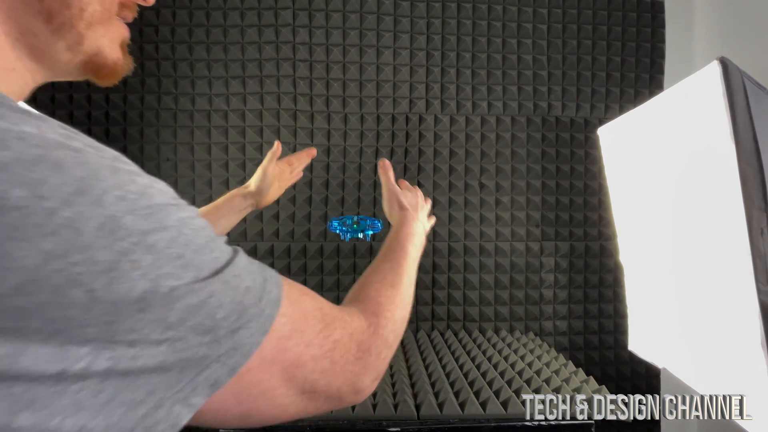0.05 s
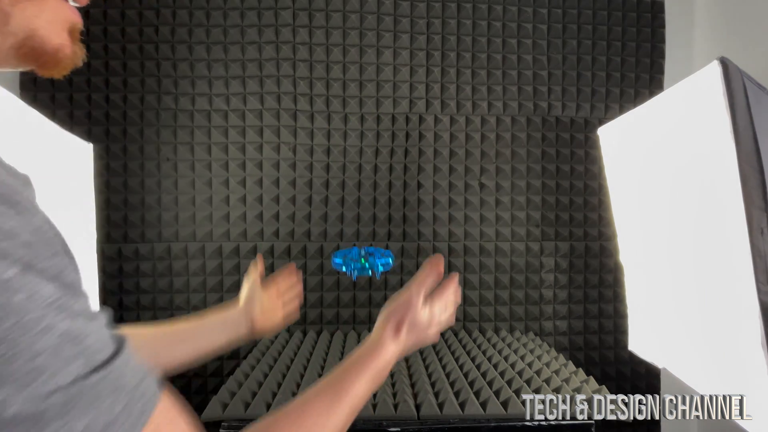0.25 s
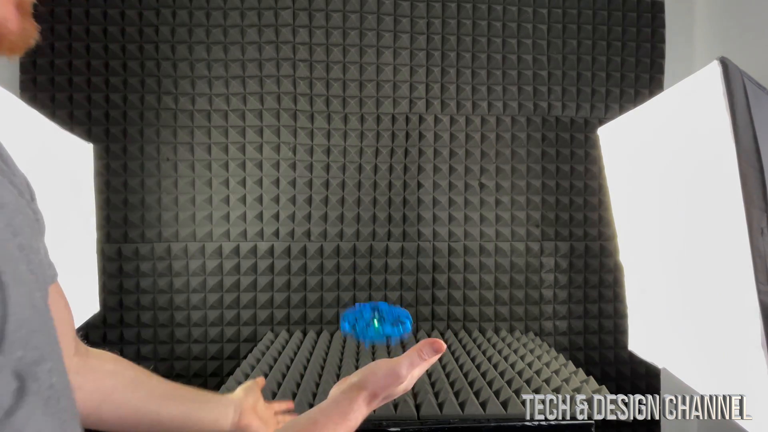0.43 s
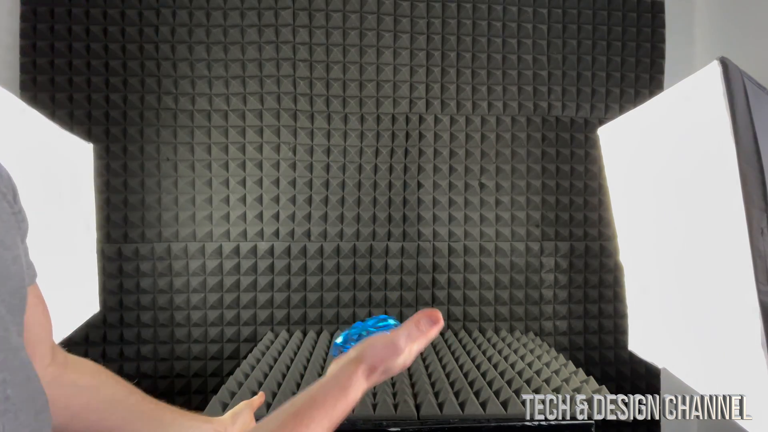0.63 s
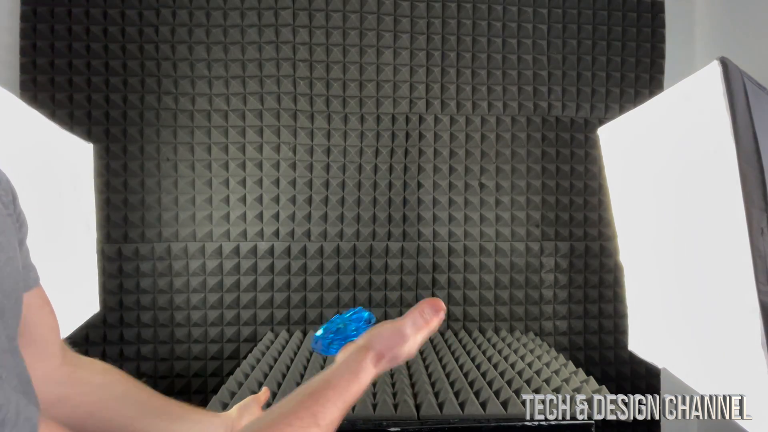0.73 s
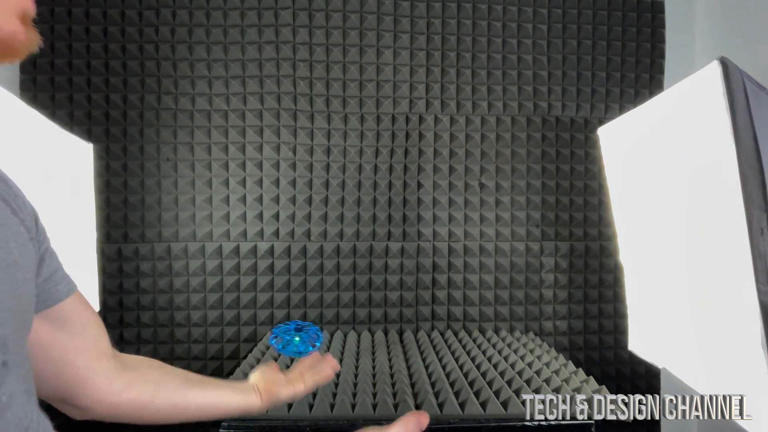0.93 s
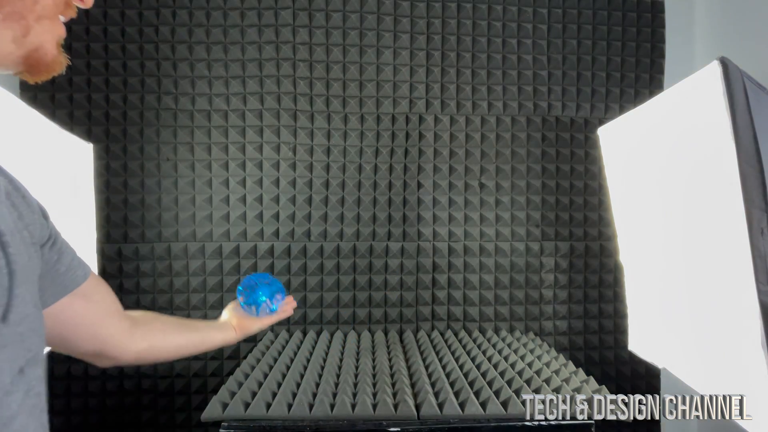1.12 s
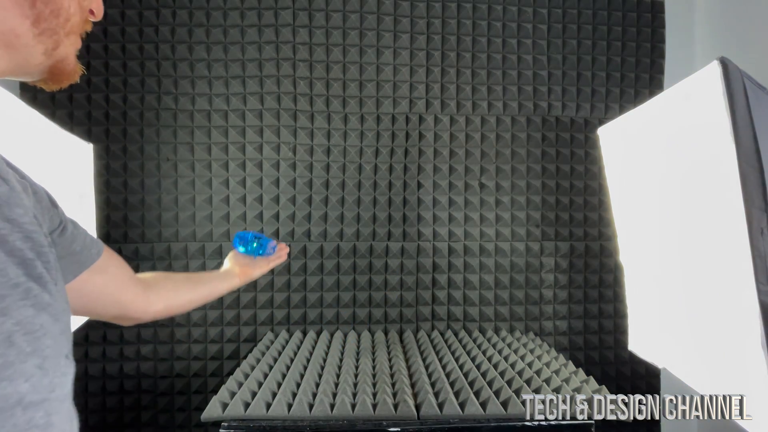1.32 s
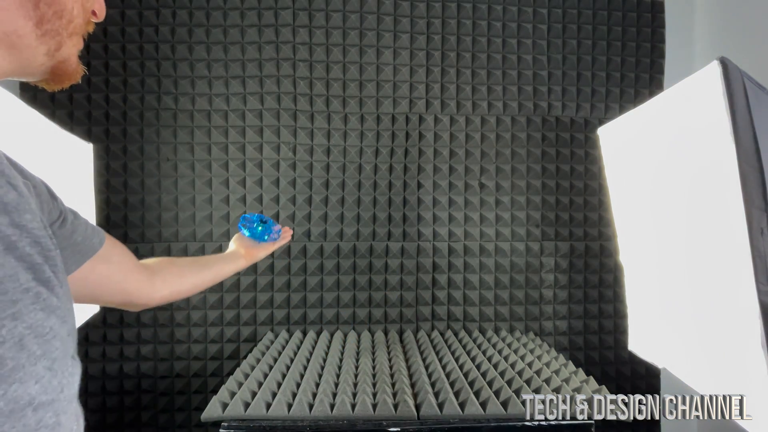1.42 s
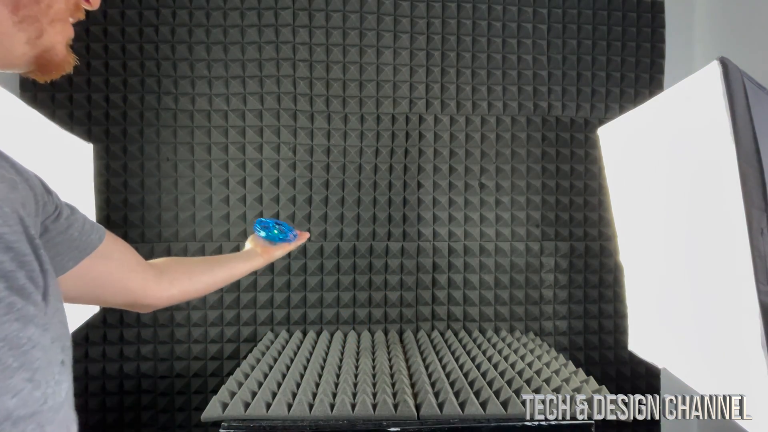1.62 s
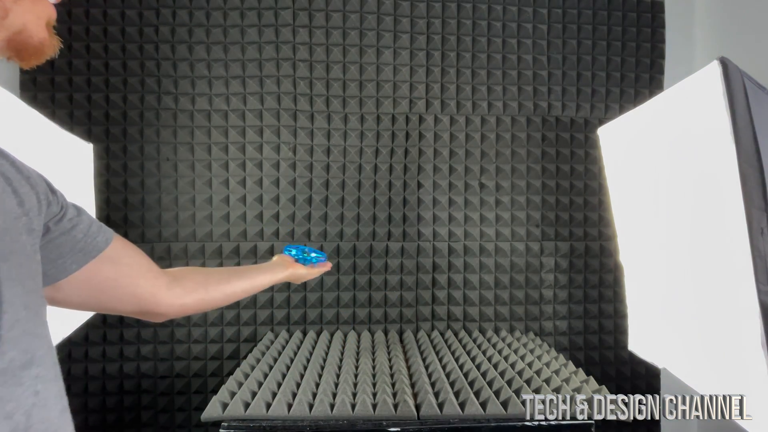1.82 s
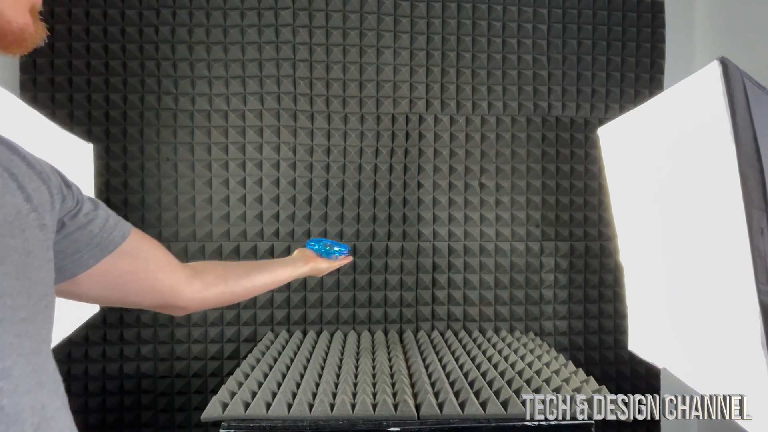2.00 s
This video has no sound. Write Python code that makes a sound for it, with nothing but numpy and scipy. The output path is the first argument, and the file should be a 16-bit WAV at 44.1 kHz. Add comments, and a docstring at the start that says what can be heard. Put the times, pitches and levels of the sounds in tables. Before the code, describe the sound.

A tiny toy drone whines and wavers, then cuts out and spins down indoors.

```python
"""A small room. A palm-sized toy drone hovers: four two-bladed rotors whine at slightly different
pitches and beat, pushing air and chopping hiss. It tips onto a hand, so two rotors race while two sag;
then all four strain, the power cuts and air drag slows them, leaving a thin rub of the motors in the
plastic shell. Underneath: a low draught on the microphone, room noise and a hum."""
import sys
import numpy as np
from scipy import signal
from scipy.fft import rfft, irfft, next_fast_len
from scipy.io import wavfile
from scipy.ndimage import map_coordinates

SR = 44100
rng = np.random.default_rng(int(sys.argv[2]) if len(sys.argv) > 2 else 0)


def transcribe(u):
    """Save the signal u as a 16-bit wav file named by the first command-line argument.

    u: samples, shape (n,) or (channels, n), limited to [-1, 1]; the rate is SR.
    q: integer samples, one column per channel.
    """
    v = np.clip(np.atleast_2d(u).T, -1, 1)
    q = np.round(v * 32767).astype(np.int16)
    wavfile.write(sys.argv[1], SR, q)


N = 90537

# Powered rotors; A and B race, C and D sag. Each row: time in seconds, blade-pass rate in Hz.
ROTOR_A_HZ = [(0, 1185), (0.118, 1199), (0.198, 1175), (.3, 1189), (0.349, 1236), (.47, 1232), (.5, 1416),
              (0.528, 1495), (.58, 1507), (0.619, 1545), (.69, 1533), (.755, 1240), (.795, 1467),
              (.87, 1444), (0.921, 1471), (.97, 1415)]
ROTOR_B_HZ = [(0, 1110), (.07, 1095), (.22, 1176), (.46, 1170), (.5, 1360), (.56, 1455), (.63, 1540),
              (.68, 1535), (.71, 1400), (.76, 1130), (.81, 1300), (.85, 1435), (.89, 1425), (0.929, 1360),
              (.97, 1380)]
ROTOR_C_HZ = [(0, 1170), (.1, 1150), (.2, 1170), (0.269, 1175), (0.368, 1162), (0.468, 1156), (0.529, 950),
              (0.619, 660), (.72, 620), (.82, 1020), (0.871, 1079), (0.921, 1141), (.97, 1185)]
ROTOR_D_HZ = [(0, 1075), (.18, 1095), (0.301, 1115), (.4, 1165), (0.469, 1130), (0.519, 900), (.62, 600),
              (.7, 563), (.77, 1055), (0.818, 1200), (0.881, 1190), (.97, 1300)]
# Mix of rotors A to D. Each row: blade tone gain in dB, overtone gain in dB, imbalance gain in dB.
ROTOR_MIX_DB = [(-34, -38, -44.5), (-35.5, -38.5, -44.5), (-38, -35.5, -48.5), (-36.5, -35, -46.5)]
# Blade overtones. Each row: multiple of the blade rate, relative level in dB.
OVERTONES_DB = [(2, 0), (3, -2.5), (4, -5.5), (5, -5.5), (6, -6.5), (8, -11), (11, -18.5)]
# Imbalance lines. Each row: odd multiple of the shaft rate, relative level in dB.
IMBALANCE_DB = [(1, -5.5), (3, -0.5), (5, 4.5), (7, -7.5), (11, -7), (19, -13)]
# Envelopes of blade tone, hiss, draught and room noise. Each row: time in seconds, gain in dB.
TONE_ENVELOPE_DB = [(0, -5), (.05, 2), (.2, 0.5), (.24, 6), (.3, 0.5), (.34, -3.5), (.52, 0), (.63, -1),
                    (.78, -1.5), (.86, 2.5), (.97, 0), (1.0, -5.5), (1.2, -8.5), (1.45, -19.5)]
HISS_ENVELOPE_DB = [(0, -30), (.13, -29.5), (.17, -26.5), (.48, -24.5), (.53, -31.5), (.6, -42.5),
                    (.74, -30.5), (.8, -22.5), (.89, -22), (.97, -25), (1.06, -37.5), (1.22, -61),
                    (1.5, -67), (1.8, -81.5)]
DRAUGHT_ENVELOPE_DB = [(0, -56), (.24, -54), (.45, -56), (.68, -55), (.74, -49.5), (.85, -50.5),
                       (1.15, -52.5), (1.3, -55.5), (1.7, -57), (1.85, -58)]
ROOM_NOISE_ENVELOPE_DB = [(1.4, -61.5), (1.6, -73.5), (1.77, -66.5), (1.85, -62.5), (2.05, -61)]
# Noise spectra. Each row: frequency in Hz, relative density in dB.
WASH_SPECTRUM_DB = [(40, -11), (130, -15.5), (300, -1.5), (600, -4), (1100, -0.5), (1750, -1.5),
                    (2700, 4.5), (4200, -2), (7000, -15), (15000, -11.5)]
HISS_SPECTRUM_DB = [(300, -29.5), (1700, -16), (2400, -11), (3400, -6.5), (4200, -5.5), (5100, -2.5),
                    (6200, 0), (7200, 2.5), (8400, 1.5), (9800, -4), (12500, -3), (15500, -9.5)]
RUB_SPECTRUM_DB = [(500, -37.5), (1000, -37), (2100, -17.5), (2800, -9), (3300, -3.5), (3850, 1),
                   (4300, -7), (5000, -17), (9000, -27), (15000, -35)]
DRAUGHT_SPECTRUM_DB = [(10, 8), (28, 2), (45, -8), (75, -14), (120, -16.5), (200, -27.5), (600, -62)]
ROOM_NOISE_SPECTRUM_DB = [(20, -2.5), (65, -8), (110, -9.5), (200, -14), (400, -14), (900, -24),
                          (1700, -20), (3500, -32), (7000, -33.5), (15000, -35)]
# Room decay. Each row: frequency in Hz, time to fall 60 dB in seconds.
ROOM_T60_S = [(200, 0.41), (1400, 0.37), (4000, 0.52), (12000, 0.48)]

HOVER_HZ, HOVER_HISS_DB = 1200, -28  # references for speed and inflow
CUT_S, HALF_SPEED_S, RUB_STOP_S = 1, .11, 1.775
TONE_DB_PER_OCTAVE, OVERTONE_DB_PER_OCTAVE = 16, 17.5


def amp(db):
    """Decibels to gain."""
    return 10 ** (np.asarray(db) / 20)


def unit_rms(x):
    """Scale to rms 1."""
    return x / np.sqrt(np.mean(x ** 2) + 1e-20)


def log_lookup(rows, at):
    """Read (frequency, value) rows on a log axis."""
    frequencies, values = np.transpose(rows)
    return np.interp(np.log(at + 1e-9), np.log(frequencies), values)


def time_s():
    """Time of each sample."""
    return np.arange(N) / SR


def curve(rows):
    """Join (seconds, value) rows by straight lines."""
    return np.interp(time_s(), *np.transpose(rows))


def wobble(knots_per_s, step=8):
    """Smooth random curve."""
    at_s = np.arange(0, N + step, step) / SR
    spline = map_coordinates(rng.standard_normal(4096), [at_s * knots_per_s], mode="wrap")
    return np.interp(time_s(), at_s, spline)


def filtered(x, gain_at_hz):
    """Zero-phase FFT filter."""
    size = next_fast_len(N + SR // 2)
    return irfft(rfft(x, size) * gain_at_hz(np.fft.rfftfreq(size, 1 / SR)), size)[..., :N]


def coloured(x, spectrum_db):
    """Shape x by a spectrum, at rms 1."""
    return unit_rms(filtered(x, lambda hz: amp(log_lookup(spectrum_db, hz))))


def noise(spectrum_db):
    """Coloured noise of rms 1."""
    return coloured(rng.standard_normal(N), spectrum_db)


def harmonics(phase_rad, orders, levels_db, size=8192):
    """Pressure pattern of rms 1, repeating each turn of the phase."""
    lines = np.zeros(size // 2 + 1, complex)
    lines[orders] = amp(log_lookup(levels_db, orders)) * np.exp(2j * np.pi * rng.random(len(orders)))
    return unit_rms(irfft(lines))[(phase_rad / (2 * np.pi) * size).astype(int) % size]


def blade_whine(octaves, phase_rad, tone_db, overtone_db, imbalance_db, flutter_db=3.5, scatter_rad=.26):
    """Blade tone, overtones and shaft imbalance lines; rough inflow smears and lifts the last two."""
    level_db = tone_db + curve(TONE_ENVELOPE_DB) + TONE_DB_PER_OCTAVE * octaves
    tone = amp(level_db + flutter_db * wobble(35.12)) * np.sqrt(2) * np.sin(phase_rad)
    inflow_db = curve(HISS_ENVELOPE_DB) - HOVER_HISS_DB
    rough_rad = phase_rad + scatter_rad * amp(.4 * inflow_db) * wobble(300)  # early and late passes
    overtone_gain = amp(overtone_db + flutter_db * wobble(110))
    overtones = overtone_gain * harmonics(rough_rad, np.arange(2, 12), OVERTONES_DB)
    imbalance = amp(imbalance_db) * harmonics(rough_rad / 2, np.arange(1, 22, 2), IMBALANCE_DB)
    return tone + amp(OVERTONE_DB_PER_OCTAVE * octaves + .2 * inflow_db) * (overtones + imbalance)


def air_wash(octaves, hover_db=-44.5, db_per_octave=11):
    """Air pushed by one rotor, louder with speed."""
    return amp(hover_db + db_per_octave * octaves) * noise(WASH_SPECTRUM_DB)


def blade_hiss(phase_rad, chop_depth=.56):
    """Hiss pulsing once per blade."""
    return noise(HISS_SPECTRUM_DB) * (1 + chop_depth * np.cos(phase_rad))


def brush_ticks(blade_hz, phase_rad, spread_db=.5):
    """Motor brushes tick twice per shaft turn, unevenly in size."""
    impulses = np.diff(phase_rad // (2 * np.pi), prepend=0)
    return impulses * amp(-spread_db * rng.standard_normal(N)) / np.sqrt(blade_hz)


def blade_rate_hz(powered_hz):
    """Driven until the cut, then slowed by air drag."""
    return curve(powered_hz) / (1 + np.maximum(time_s() - CUT_S, 0) / HALF_SPEED_S)


def motor_rub(ticks, hover_db=-44, db_per_octave=6, ticks_over_friction_db=5, fade_s=.042):
    """Brush ticks and friction ring the shell, weaker as the motors slow, until standstill."""
    turning = np.clip((RUB_STOP_S - time_s()) / fade_s, 0, 1)
    drive = amp(ticks_over_friction_db) * unit_rms(ticks) + rng.standard_normal(N)
    shell = coloured(drive, RUB_SPECTRUM_DB)
    octaves = np.log2(blade_rate_hz(ROTOR_A_HZ) / HOVER_HZ)
    return turning * amp(hover_db + db_per_octave * octaves + .8 * wobble(82)) * shell


def drone(speed_jitter=.005, hiss_trim_db=-2):
    """Four rotors, each with whine, wash, hiss and ticks tied to its own speed."""
    whine_and_wash, hiss, ticks = np.zeros((3, N))
    for powered_hz, mix_db in zip([ROTOR_A_HZ, ROTOR_B_HZ, ROTOR_C_HZ, ROTOR_D_HZ], ROTOR_MIX_DB):
        blade_hz = blade_rate_hz(powered_hz) * (1 + speed_jitter * wobble(130))
        phase_rad = 2 * np.pi * (np.cumsum(blade_hz) / SR + rng.uniform())
        octaves = np.log2(blade_hz / HOVER_HZ)
        whine_and_wash += blade_whine(octaves, phase_rad, *mix_db) + air_wash(octaves)
        hiss += blade_hiss(phase_rad)
        ticks += brush_ticks(blade_hz, phase_rad)
    hiss_db = curve(HISS_ENVELOPE_DB) + hiss_trim_db + .59 * wobble(120)
    return whine_and_wash + amp(hiss_db) * unit_rms(hiss) + motor_rub(ticks)


def room_response(echoes=8, walls_db=-7.5, tail_db=-4):
    """Direct sound, near walls and a diffuse tail for one drone position."""
    hz, age_s, spectra = signal.stft(rng.standard_normal(SR // 3), SR, nperseg=256)
    decay = amp(-60 * age_s / log_lookup(ROOM_T60_S, hz)[:, None])
    tail = signal.istft(spectra * decay, SR, nperseg=256)[1]
    tail = np.pad(tail, (SR // 150, 0))  # pre-delay
    response = amp(tail_db) * tail / np.linalg.norm(tail)
    delays_s = rng.uniform(.002, .02, echoes)
    response[(delays_s * SR).astype(int)] += amp(walls_db) * rng.choice([-1, 1], echoes) / np.sqrt(echoes)
    response[0] = 1
    return response / np.linalg.norm(response)


def room(x, renew_s=.11):
    """The drone drifts, so each reflection pattern crossfades into a new one."""
    hop = int(renew_s * SR)
    padded = np.pad(x, (hop, 2 * hop))
    out = np.zeros(N + 2 * SR)
    for start in range(0, N + hop, hop):
        heard = signal.fftconvolve(padded[start:start + 2 * hop] * np.hanning(2 * hop), room_response())
        out[start:start + len(heard)] += heard
    return out[hop:hop + N]


def background(hum_hz=64.8, hum_db=-65.5, draught_trim_db=1):
    """Low hum, draught on the microphone, and room noise that dips briefly."""
    hum = amp(hum_db + 2 * wobble(3.5)) * np.sin(2 * np.pi * hum_hz * time_s())
    draught = amp(curve(DRAUGHT_ENVELOPE_DB) + draught_trim_db) * noise(DRAUGHT_SPECTRUM_DB)
    room_noise = amp(curve(ROOM_NOISE_ENVELOPE_DB)) * noise(ROOM_NOISE_SPECTRUM_DB)
    return draught + room_noise + hum


def scene():
    """Drone in the room over the background, both channels alike."""
    mono = room(drone()) + background()
    return np.array([mono, mono])


def record(dry):
    """Brick-wall low-pass."""
    return filtered(dry, lambda hz: hz < 15760)


dry = scene()
out = record(dry)
transcribe(out)
```